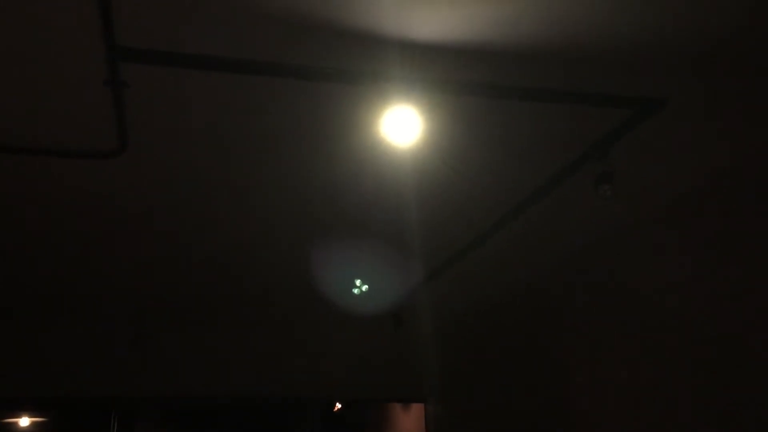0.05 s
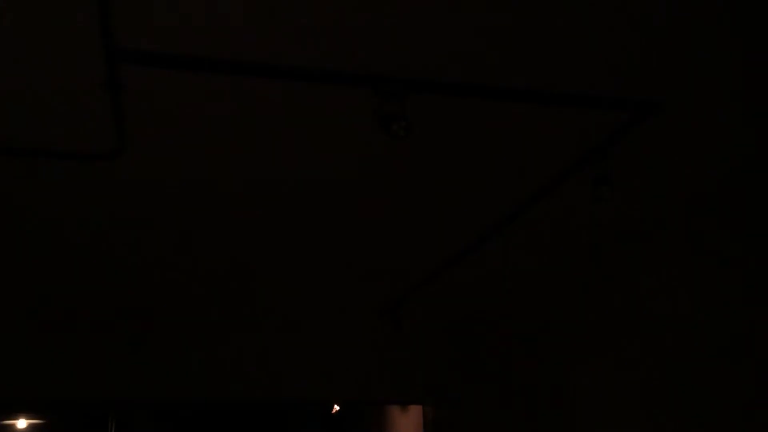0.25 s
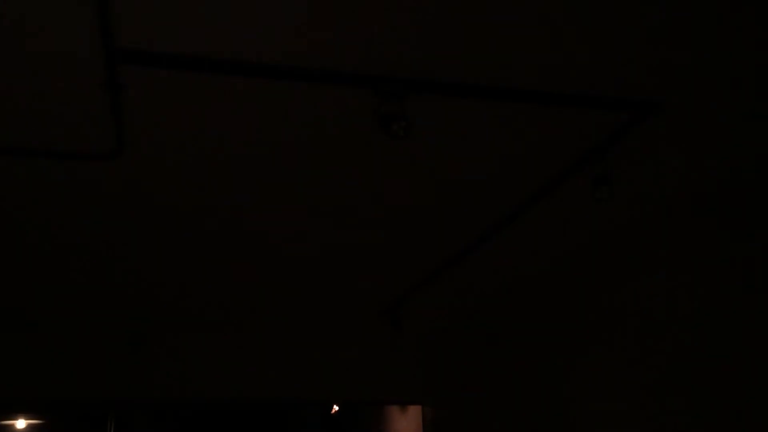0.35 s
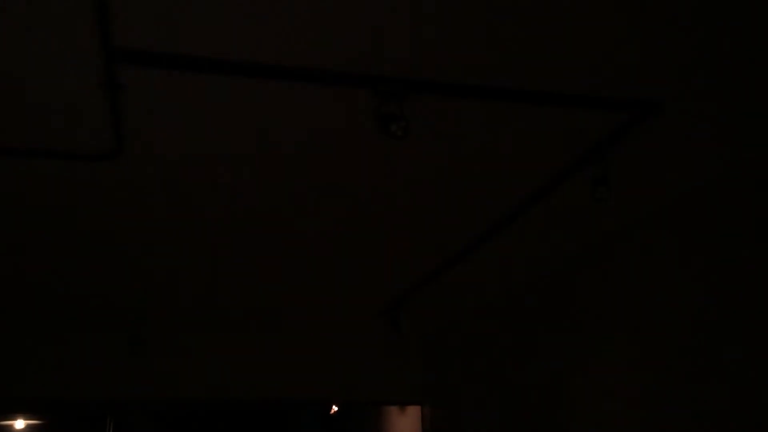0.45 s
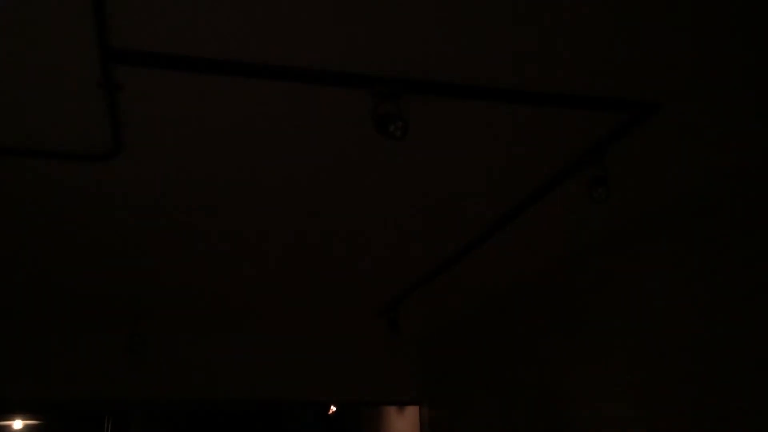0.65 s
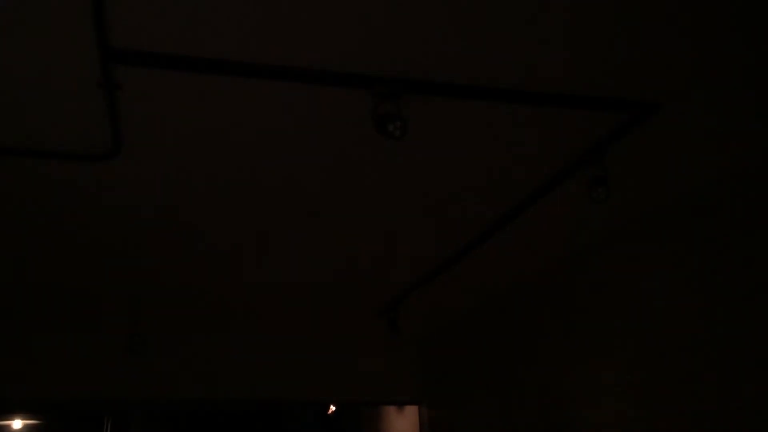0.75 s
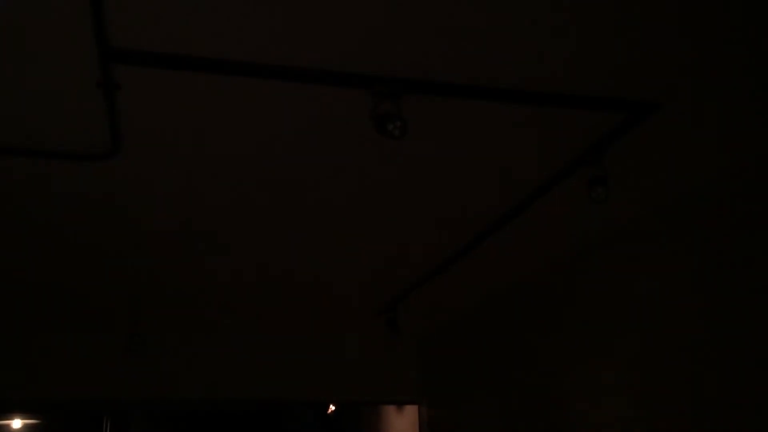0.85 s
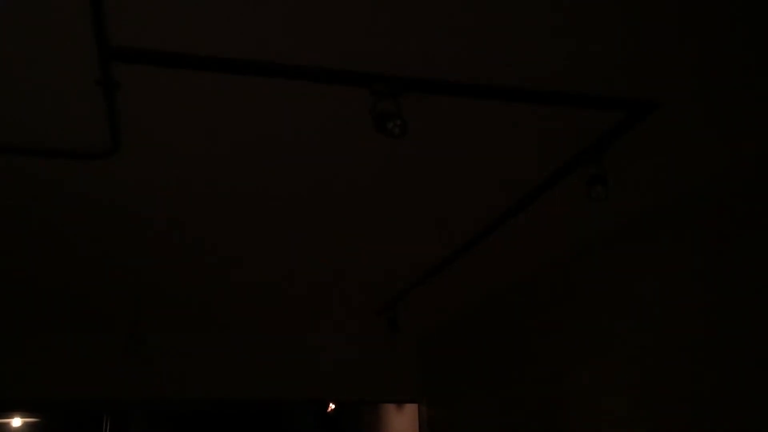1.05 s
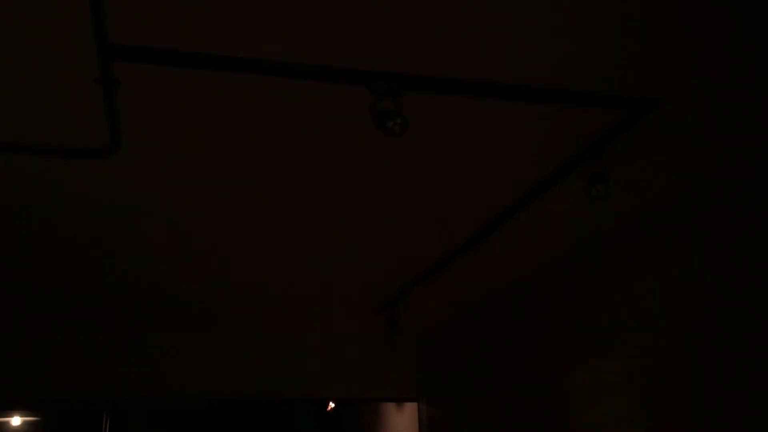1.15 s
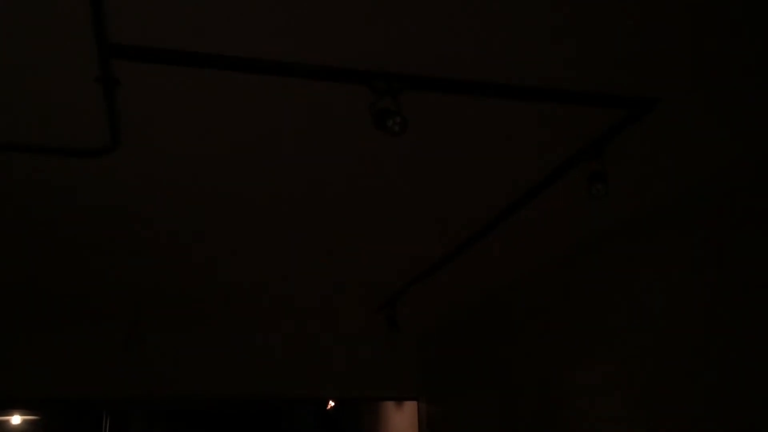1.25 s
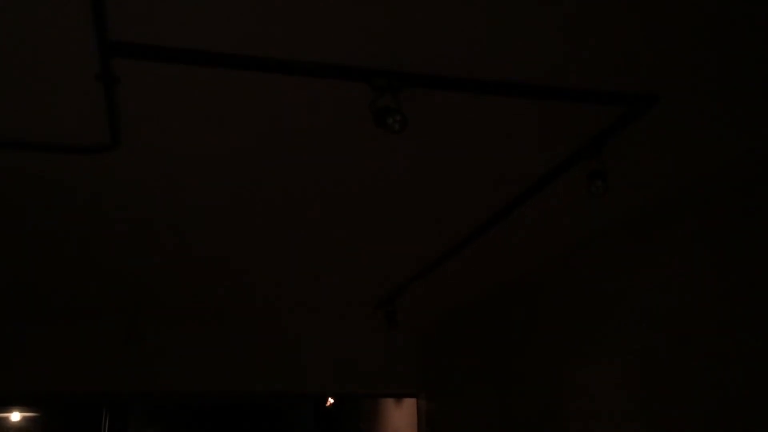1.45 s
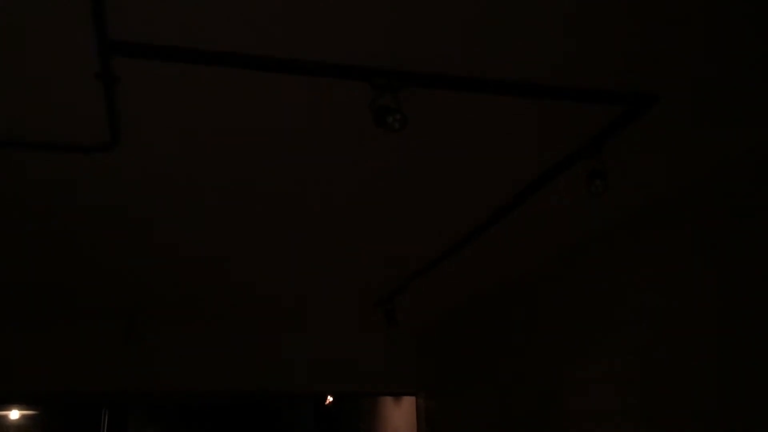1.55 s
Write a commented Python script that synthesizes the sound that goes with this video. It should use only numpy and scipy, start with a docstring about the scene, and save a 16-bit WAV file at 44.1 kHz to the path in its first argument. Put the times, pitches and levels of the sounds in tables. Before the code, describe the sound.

A light switch snaps off once, echoing briefly in a room with quiet ventilation.

```python
"""Light switch in a hard-walled room

A switch is snapped off once, a few metres away. Its spring pings and its contacts strike the
plastic housing, exciting damped resonances of housing and wall box. The room answers with
a few slaps, a short bright tail and standing waves. Ventilation rumbles quietly throughout."""
import sys
import numpy as np
from scipy import signal
from scipy.fft import rfft, irfft
from scipy.io import wavfile

SR = 44100
rng = np.random.default_rng(int(sys.argv[2]) if len(sys.argv) > 2 else 0)


def wrap_up_sound(samples):
    """Save the sound to the file named by the first command line argument, as 16-bit audio."""
    columns = np.atleast_2d(samples).T
    # keep every value between -1 and 1, then stretch to whole-number steps
    tamed = np.clip(columns, -1, 1)
    steps = np.round(tamed * 32767).astype(np.int16)
    wavfile.write(sys.argv[1], SR, steps)


N = 70560
TIME = np.arange(N) / SR
FREQS = np.fft.rfftfreq(N, 1 / SR) + 1e-3
SNAP_S = .2045


def from_db(db):
    """Amplitude ratio of a level in decibels."""
    return 10 ** (np.asarray(db) / 20)


def rms_one(x):
    """Normalisation to unit rms."""
    return x / np.sqrt(np.mean(x ** 2) + 1e-20)


def at_hz(points, hz):
    """Interpolation on a logarithmic frequency axis."""
    f, level = np.transpose(points)
    return np.interp(np.log(hz), np.log(f), level)


def impulse(s, db):
    """An ideal impulse at time s: equal energy at all frequencies."""
    return from_db(db) * (np.arange(N) == int(s * SR))


def soften(x, hz):
    """A first-order low-pass spreads an impulse in time."""
    pole = np.exp(-2 * np.pi * hz / SR)
    return signal.lfilter([1 - pole], [1, -pole], x + 1e-18)


def resonate(x, modes):
    """Modal superposition: damped resonators in parallel, alternating in sign."""
    out = 0
    for k, (hz, width, db) in enumerate(modes):
        r = np.exp(-np.pi * width / SR)
        feedback = [1, -2 * r * np.cos(2 * np.pi * hz / SR), r * r]
        gain = (-1) ** k * from_db(db) * (1 - r * r) / 2
        out = out + gain * signal.lfilter([1, 0, -1], feedback, x + 1e-18)
    return out


def decay(t60):
    """Exponential decay by 60 dB in t60 seconds."""
    return np.exp(-np.log(1000) * TIME / t60)


def noise(spectrum):
    """Random phases turn an amplitude spectrum into stationary noise of unit rms."""
    phases = np.exp(2j * np.pi * rng.random(len(FREQS)))
    return rms_one(irfft(spectrum * phases, N))


# The rocker hits its stop and bounces once: t/s after the snap, level/dB, low-pass f/Hz
IMPACTS = [(.0006, -1.5, 9000), (.0043, -17, 5000)]
# Modes of the wall box and housing: f/Hz, bandwidth/Hz, level/dB
HOUSING_MODES = [(208.4, 79.7, 4.5), (294.5, 91.2, 5), (413.3, 31.25, 3), (686, 160, -15),
                 (1121, 130, -4.5), (1244.2, 103.8, -0.5), (1848.6, 337, -3.5), (2546, 422, -5),
                 (3050, 464, -1.5), (3925, 479, -5.5), (4434, 390, -7), (5771, 400, -6.5),
                 (6843, 490, -9.5), (9270, 690, -13.5), (11700, 470, -31)]
# Modes of the spring: f/Hz, bandwidth/Hz, level/dB
SPRING_MODES = [(11530, 2300, -17), (13740, 320, -4.5), (14802, 500, -11.5)]


def switch():
    """Impact excitation: the released spring pings, then the contacts set the housing ringing."""
    blows = sum(soften(impulse(SNAP_S + s, db), hz) for s, db, hz in IMPACTS)
    # The housing is too small to radiate deep bass.
    radiation = signal.butter(3, 170, "high", fs=SR, output="sos")
    clack = signal.sosfilt(radiation, resonate(blows, HOUSING_MODES))
    ping = resonate(impulse(SNAP_S, db=0), SPRING_MODES)
    return from_db(17) * clack + from_db(14) * ping


# Reverberation time by band: f/Hz, T60/s
REVERB_TIMES = [(150, 0.02), (350, 0.84), (1000, 0.6111), (2000, 0.7876), (3500, 0.6979), (6500, 0.6466),
                (10000, 0.5151), (15000, 0.4787)]
# Spectrum of the diffuse field before it decays: f/Hz, level/dB
REVERB_SPECTRUM = [(100, 9.5), (200, -6), (420, 0.5), (540, 3), (720, 6.5), (1500, 5), (3000, -1.5),
                   (6000, 1), (9000, 3.5), (15000, -0.5)]


def reverberation():
    """Absorption depends on frequency, so each band of the diffuse field decays at its own rate."""
    diffuse = rfft(noise(from_db(at_hz(REVERB_SPECTRUM, FREQS))))
    centres, t60s = np.transpose(REVERB_TIMES)
    tail = 0
    for weights, t60 in zip(np.eye(len(t60s)), t60s):
        band = np.interp(np.log(FREQS), np.log(centres), weights)
        tail = tail + irfft(diffuse * band, N) * decay(t60)
    return tail


# Distinct wall reflections: t/s after the direct sound, level/dB, low-pass f/Hz
WALL_ECHOES = [(.0022, -4.5, 2000), (.0038, -3.5, 3500), (.0051, -3.5, 5988), (.0067, -5, 7000),
               (0.0087, -6, 4000), (0.0146, -14, 6000), (0.0343, -4, 2000), (.0645, -10, 600)]


def room():
    """Impulse response: direct sound, wall reflections, scatter from nearby surfaces and the tail."""
    direct = impulse(0, db=-3.5)
    slaps = sum(soften(impulse(s, db), hz) for s, db, hz in WALL_ECHOES)
    build_up = 1 - np.exp(-TIME / .00643)
    scatter = from_db(-.54) * rms_one(noise(1) * decay(t60=.1722) * build_up)
    tail = from_db(2.243) * rms_one(reverberation() * build_up)
    return direct + slaps + (scatter + tail) / np.sqrt(N)  # unit rms becomes unit energy


# Room modes and, last, a faint long ring, perhaps of a metal fitting: f/Hz, level/dB, T60/s
RINGING_MODES = [(175.86, -54, 2.9), (207.4, -38.5, 0.88), (284.3, -80.5, 0.23), (301.25, -30.5, 0.517),
                 (332.3, -37, .7), (422, -45, 0.93), (1049.3, -39.5, 0.53), (1333, -45, .5),
                 (1610.7, -44, 0.44), (1864.3, -39, 0.34), (2186.7, -33, 0.34), (2553, -44, 0.31),
                 (3049, -47, 0.57), (3184, -59.5, 2.22)]


def standing_waves():
    """Free vibration: each mode excited by the snap rings on as a damped sinusoid."""
    rings = sum(from_db(db) * np.sin(2 * np.pi * hz * TIME) * decay(t60) for hz, db, t60 in RINGING_MODES)
    return signal.fftconvolve(impulse(SNAP_S, db=0), rings)[:N]


# Spectral density of the air noise: f/Hz, relative level/dB
AIR_SPECTRUM = [(25, -8.5), (55, -0.5), (110, -3), (150, 2.5), (185, -3.5), (240, -1), (320, -2.5),
                (380, -9), (480, -12.5), (700, -9.5), (1050, -10), (1600, -14.5), (2500, -28.5),
                (3400, -33.5), (4800, -41.5), (9000, -45.5), (15000, -51.5)]
# Duct resonances and a faint whistle: f/Hz, bandwidth/Hz, rms level/dB
DUCT_MODES = [(70.56, 9.5, -54), (98.62, 14.1, -50), (281.6, 18, -59.5), (972.3, 130, -62), (2795, 12, -85)]
# Slow swell of the ventilation: t/s, level/dB
AIR_SWELL = [(0, 0), (.08, -0.5), (.16, 2), (.4, 0.5), (.58, 0.5), (.78, 0), (.9, 0), (1.14, -1),
             (1.27, 1.5), (1.37, 0.5), (1.47, 1.5), (1.6, 0)]


def ventilation():
    """Broadband air noise and the narrow noise bands of duct resonance swell gently together."""
    air = from_db(-49.5) * noise(from_db(at_hz(AIR_SPECTRUM, FREQS)))
    drone = 0
    for hz, width, db in DUCT_MODES:
        resonance = 1 / (1 + (2 * (FREQS - hz) / width) ** 2)
        drone = drone + from_db(db) * noise(resonance)
    swell = from_db(np.interp(TIME, *np.transpose(AIR_SWELL)))
    return swell * (air + drone)


def scene():
    """Convolution places the switch in the room; standing waves and ventilation superpose on it."""
    snap = signal.fftconvolve(switch(), room())[:N]
    return (snap + standing_waves() + ventilation())[None]


def record(dry):
    """Band limiting: a steep elliptic low-pass removes the highest treble."""
    cutoff_hz = 15450
    return signal.sosfilt(signal.ellip(12, .2, 80, cutoff_hz, fs=SR, output="sos"), dry)


dry = scene()
out = record(dry)
wrap_up_sound(out)
```